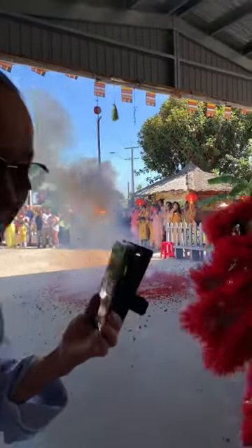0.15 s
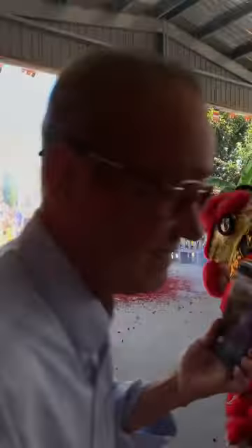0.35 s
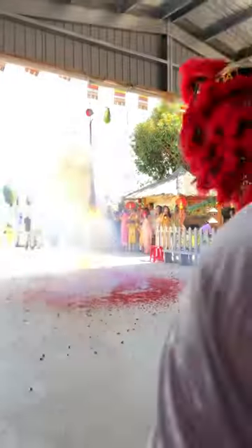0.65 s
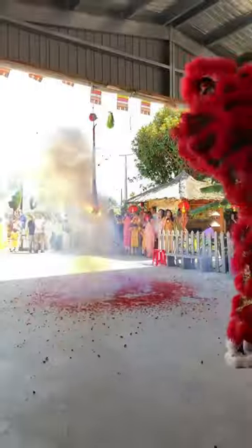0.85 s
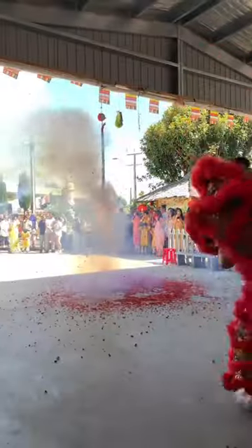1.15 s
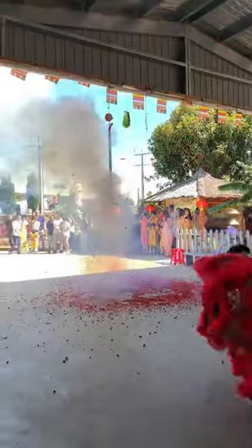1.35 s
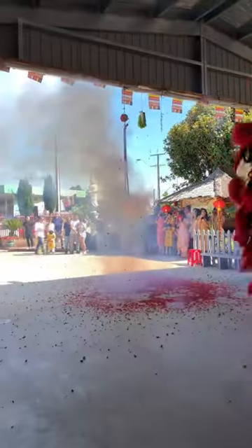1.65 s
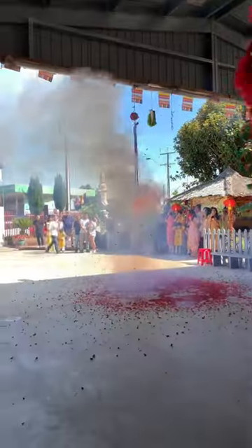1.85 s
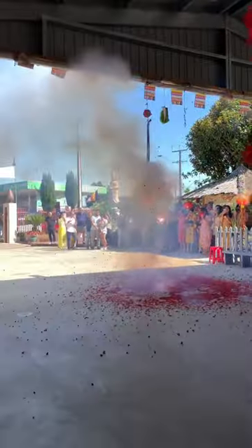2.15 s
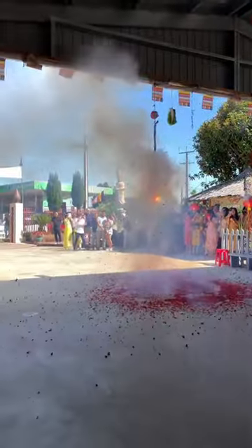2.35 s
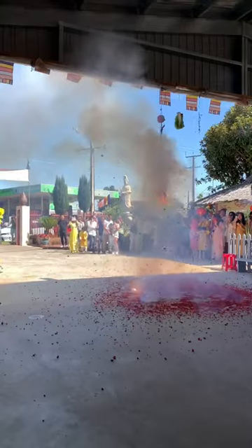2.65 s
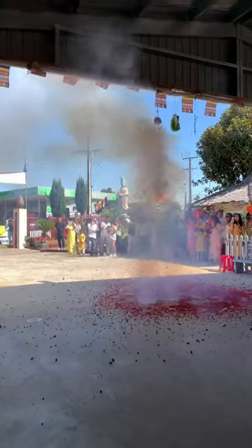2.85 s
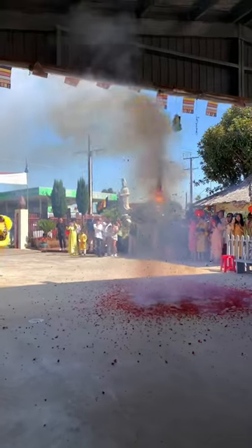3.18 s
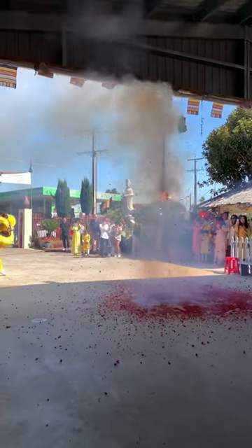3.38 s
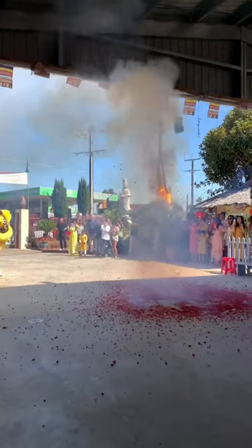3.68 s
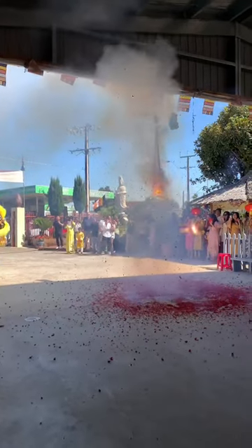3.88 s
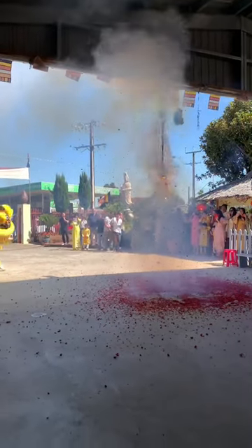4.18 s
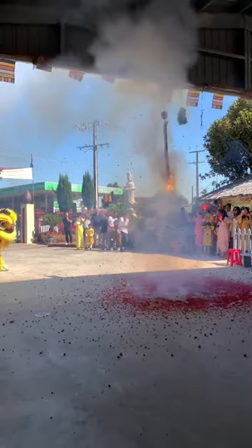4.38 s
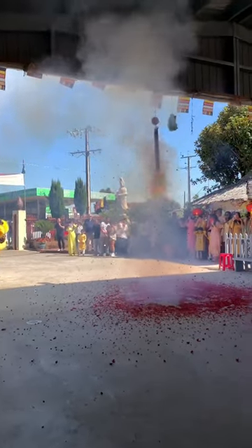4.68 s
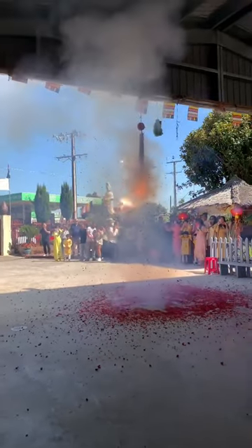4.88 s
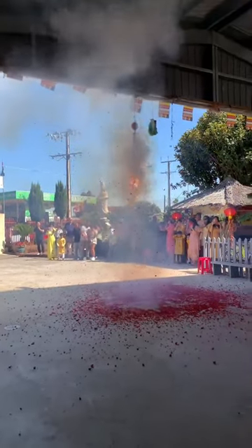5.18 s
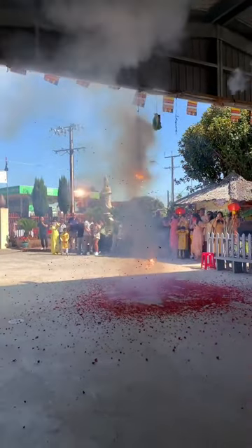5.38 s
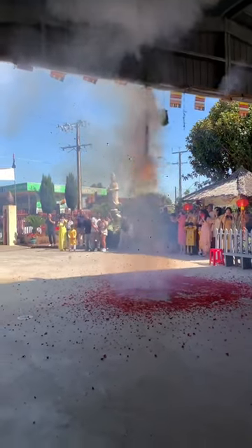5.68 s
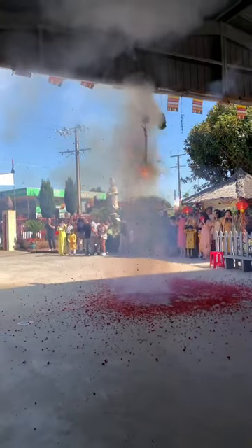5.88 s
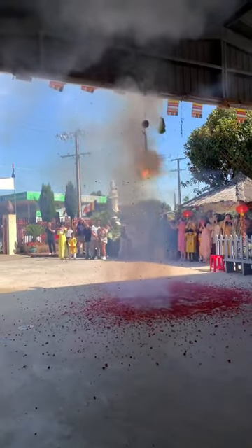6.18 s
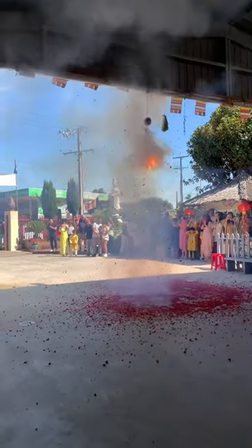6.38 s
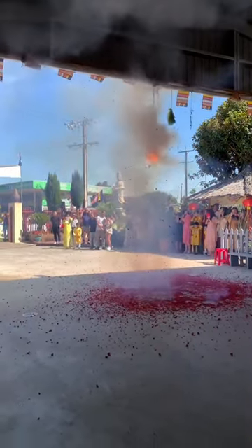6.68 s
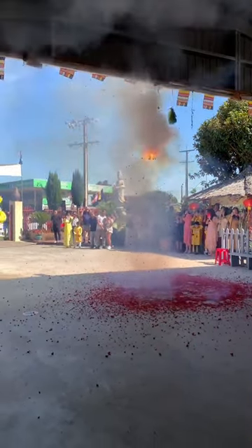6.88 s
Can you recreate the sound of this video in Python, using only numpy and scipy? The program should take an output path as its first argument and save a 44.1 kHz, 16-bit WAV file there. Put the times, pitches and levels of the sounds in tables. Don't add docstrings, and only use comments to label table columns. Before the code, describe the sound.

From 0 s a long firecracker string is already exploding just outside an open, sheet-roofed shed, heard from beneath the roof. Bangs come in quick uneven runs, roughly ten to thirty milliseconds apart, mixed with lone pops of differing loudness. Each has an abrupt shock front, ragged ground bounces, a bright crack and a short low thump. Slaps from roof, posts and floor answer within tens of milliseconds, blurring into a diffuse tail of under a second. Small gaps open around 0.3-0.5 and 0.9 s; from 2 s the crackle thickens. Around 3.6-3.75 s the fuse lulls and only the tail lingers, then it catches again at about 3.8 s, with harder blasts near 4.4, 5.3 and 6.5 s. Slight breaths fall near 5.7 and 6.0 s. Loud bangs continue right to the cut at 7 s. Stereo, peaks softly overloaded, faint street hiss beneath.

```python
import sys
import numpy as np
from scipy import signal
from scipy.fft import rfft, irfft, next_fast_len
from scipy.io import wavfile

SR = 44100
rng = np.random.default_rng(int(sys.argv[2]) if len(sys.argv) > 2 else 0)


def to_wav(s):
    ch = np.atleast_2d(s).T
    pcm = np.round(np.clip(ch, -1, 1) * 32767)
    wavfile.write(sys.argv[1], SR, pcm.astype(np.int16))


def elevation(decibels):
    levels = np.asarray(decibels, float)
    return 10 ** (levels / 20)


N = 310464
SIZE = next_fast_len(N + SR)
HZ = np.arange(SIZE // 2 + 1) * SR / SIZE
RUN_IN = int(.1 * SR)
PLACES = 10


def at_hz(table, hz):
    at, *columns = np.transpose(table)
    return [np.interp(np.log(hz), np.log(at), column) for column in columns]


def butter(x, hz, kind):
    return signal.sosfilt(signal.butter(2, hz, kind, fs=SR, output="sos"), x)


def causal(db):
    cepstrum = irfft(np.log(elevation(db)), SIZE)
    cepstrum[1:SIZE // 2] *= 2
    cepstrum[SIZE // 2 + 1:] = 0
    return np.exp(rfft(cepstrum))


def fuse(count=12):
    # (start [s], first cracker [dB], last cracker [dB], thump re blast [dB])
    runs_before_lull = [(0.053, -9.5, -9, -17), (0.157, -9, -13.5, -8.5), (0.216, -9, -20, -11),
                        (.515, -6, -15, -17.5), (0.755, -10, -8, -12), (0.808, -11, -6, -11),
                        (1.007, -15, -6.5, -11), (1.181, -9, -7, -14), (1.31, -8, -6, -9.5),
                        (1.529, -9.5, -13, -12), (1.6, -11, -9.5, -13.5), (1.747, -10, -10.5, -18.5),
                        (1.807, -8.5, -9.5, -13), (2.007, -9.5, -10.5, -12.5), (2.153, -8, -7.5, -8),
                        (2.291, -7, -12, -13.5), (2.393, -8.5, -16, -18), (2.531, -11.5, -9, -10.5),
                        (2.809, -10, -14.5, -12.5), (2.916, -9, -17, -9), (3, -9, -9, -19),
                        (3.071, -10, -8.5, -13), (3.305, -9, -12, -12.5), (3.442, -11.5, -15, -9)]
    # (start [s], first cracker [dB], last cracker [dB], thump re blast [dB])
    runs_after_lull = [(3.778, -11, -9.5, -15.5), (3.935, -9.5, -13.5, -13.5), (4.046, -9, -15, -29),
                       (4.136, -6, -10, -18), (4.222, -14.5, -10.5, -9.5), (4.391, -5.5, -3.5, -14.5),
                       (4.586, -11, -11.5, -10), (4.782, -10, -4.5, -11), (4.999, -7, -11.5, -13),
                       (5.117, -8, -8, -8.5), (5.277, -9, -39, -13.5), (5.323, -4, -9, -17),
                       (5.428, -9, -9, -8.5), (5.543, -8.5, -12, -8.5), (5.622, -7, -8.5, -10.5),
                       (5.853, -8, -15, -13.5), (5.901, -9, -13, -7), (6.079, -8.5, -12.5, -14.5),
                       (6.347, -10.5, -11.5, -16), (6.437, -10, -11, -9), (6.533, -7, -12.5, -16),
                       (6.741, -8.5, -19, -15.5), (6.88, -10.5, -8, -17), (6.979, -4, -7, -13)]
    lengths_before_lull = [56, 31, 67, 57, 7, 14, 101, 64, 75, 9, 18, 22, 139, 108, 84, 30, 57, 134, 32, 51,
                           27, 111, 52, 111]
    lengths_after_lull = [43, 60, 21, 55, 68, 88, 27, 44, 38, 48, 12, 77, 92, 63, 40, 14, 64, 78, 57, 78,
                          72, 47, 71, 53]
    # (time [s], blast [dB], crack re blast [dB],
    # thump re blast [dB])
    standout_crackers = [(-.012, -5.5, -11, -13), (.088, -9.5, -12, -6.5), (.394, -13, -8.5, -9),
                         (.539, -8, -10, -9.5), (.558, -8, -10, -34), (.624, -14, -0.5, -7),
                         (0.68, -11, -9, -14), (.942, -11, -3.5, -13.5), (1.018, -6, -3, -24),
                         (1.031, -9.5, -13, -15.5), (1.097, -8, -16, -23), (1.199, -3, -10, -14),
                         (1.218, -9, -5.5, -37), (1.326, -7.5, -13, -14), (1.439, -11, -5.5, -36),
                         (2.061, -7.5, -4.5, -7), (2.094, -7, -11, -10.5), (2.162, -5, -9, -7),
                         (2.437, -5, -10, -14.5), (2.491, -10, -8.5, -9), (2.568, -5.5, -11, -34),
                         (2.63, -7.5, -8, -17.5), (2.711, -7.5, -5.5, -13.5), (2.756, -10, -10, -17),
                         (2.822, -8.5, -6, -20), (2.939, -7, -13, -6), (3.253, -9, -11, -8),
                         (3.406, -8.5, -8, -13), (3.456, -9.5, -10, -17), (3.486, -5.5, -19, -31),
                         (3.8, -9.5, -5.5, -22), (3.9, -10, -12, -18), (4.052, -7, -8, -8),
                          (4.243, -5, -12, -14), (4.338, -7.5, -12, -12.5), (4.423, -8.5, -5, -16),
                          (4.451, -7.5, -10, -10), (4.674, -9, -6.5, -16), (4.714, -9.5, -7.5, -14),
                          (4.744, -13.5, -1, -5), (4.809, -9, -4.5, -11), (4.893, -8, -16, -30),
                          (4.932, -5.5, -9, -11), (5.137, -9.5, -3, -11), (5.219, -9.5, -8, -12),
                          (5.327, -7.5, -10, -8), (5.476, -9, -3, -29), (5.575, -6.5, -14, -15),
                          (5.792, -8.5, -8.5, -14), (6.223, -10, -7, -27), (6.249, -7.5, -7.5, -15.5),
                          (6.289, -8, -8.5, -18), (6.469, -3.5, -11.5, -17), (6.493, -6, -8, -24),
                          (6.647, -10.5, -12, -16), (6.679, -9, -10, -33), (6.844, -6, -12.5, -23),
                          (6.943, -6.5, -9.5, -21), (5.345, -9, -3, -7.5), (7.008, -3, -10, -22),
                         (.083, -6.5, -8, -13), (0.175, -6.5, -21, -11), (.248, -8.5, -13, -13.5),
                    (1.052, -9.5, -7, -14), (1.071, -11, -3, -11), (1.337, -9, -12, -16),
                    (1.361, -12, -6, -19), (1.83, -12, -3, -8), (1.856, -12, -16, -15),
                    (1.888, -17, -20, -1.5), (1.919, -12, -7, -21), (2.304, -10, -18, -7),
                    (2.588, -10, -10, -12), (2.658, -14, -8, -5), (3.106, -9.5, -6, -15),
                    (3.149, -10, -2, -13), (3.323, -13, 0, -13), (3.519, -9, -11, -16),
                    (3.955, -9, -10, -16), (4.172, -10.5, -5, -11), (4.266, -11.5, 0, -10),
                    (4.439, -6, -15, -16), (5.372, -9, -3, -10), (5.496, -6, -12, -14),
                    (5.563, -3, -8, -30), (5.922, -9.5, -4, -22), (5.94, -5, -11, -16),
                    (5.959, -8, -8, -24), (6.562, -7.5, -28, -22), (6.924, -7.5, -5, -12.5)]
    # (time [s], blast [dB], thump re blast [dB])
    more_pops = [(0.109, -15.5, -11), (0.186, -20, -22), (0.29, -12, -18), (0.571, -15, -18),
                 (0.755, -12.5, -23), (0.87, -26, -18), (1.109, -11.5, -12), (1.128, -18, -16),
                 (1.145, -22, -21), (1.191, -11.5, -8), (1.248, -8.5, -10), (1.539, -23, -8),
                 (1.539, -10.5, -26), (1.577, -24, -18), (1.634, -19.5, -18), (1.677, -28, -23),
                 (1.766, -16, -12), (1.936, -17, -18), (1.945, -12, -6), (1.991, -20, -18),
                 (2.035, -10, -27), (2.05, -12, -7), (2.103, -10, -9), (2.132, -15, -27),
                 (2.236, -15.5, -18), (2.255, -12, -18), (2.402, -11, -25), (2.56, -13.5, -14),
                 (2.609, -9.5, -12), (2.643, -7.5, -18), (2.675, -14.5, -13), (2.705, -16, -6),
                 (2.84, -12, -13), (2.931, -8, -27), (2.968, -14, -22), (3.009, -19, -24),
                 (3.027, -20, -16), (3.09, -8, -11), (3.12, -14, -18), (3.179, -13, -3),
                 (3.262, -12.5, -21), (3.356, -8, -12), (3.465, -11, -32), (3.551, -11.5, -17),
                 (3.571, -20, -18),
                 (3.835, -22, -5), (3.98, -12, -23), (3.99, -9.5, -11), (4.071, -14, -22),
                            (4.162, -10.5, -14), (4.289, -11, -17), (4.407, -8.5, -16), (4.631, -20, -16),
                            (4.737, -17, 2), (4.813, -9, -23), (4.898, -9.5, -18), (5.015, -12, -15),
                            (5.15, -6, -26), (5.29, -19, -14), (5.396, -10.5, -10), (5.452, -7, -16),
                            (5.518, -12, -12), (5.53, -12, -18), (5.568, -9.5, -14), (5.595, -8, -21),
                            (5.811, -16, -23), (5.869, -15, -18), (5.891, -10, -21), (5.907, -9, -23),
                            (6.088, -16, -10), (6.102, -5, -17), (6.132, -9, -14), (6.157, -17.5, -19),
                            (6.376, -10.5, -13), (6.403, -12.5, -14), (6.59, -10, -22), (6.787, -11, -14),
                            (6.865, -17, -21), (6.892, -17, -20), (7.019, -8.5, -1)]
    shortest_gap_s, gap_spread_s = .012, .016
    inner_loss_db, inner_scatter_db = 4, 2
    run_crack_db, usual_blast_db, crack_follows = -16.5, -10, .62
    hollow_share, hollow_loss_db = .65, 12

    start, first_db, last_db, thump_db = np.transpose(runs_before_lull + runs_after_lull)[:, :, None]
    length = np.array(lengths_before_lull + lengths_after_lull)[:, None] / 1000
    pops = [(s, db, -8.5, low_db) for s, db, low_db in more_pops]
    singles = np.transpose(standout_crackers + pops)

    gap, size, bright, hollow = rng.random((len(start), count, 4)).transpose(2, 0, 1)
    after = np.cumsum(shortest_gap_s + gap_spread_s * gap, axis=1)
    after -= after[:, 1:2]
    after[:, 0], after[:, 1] = 0, length[:, 0]
    inner = np.arange(count) > 1

    blast = first_db + (last_db - first_db) * np.minimum(after / length, 1)
    blast = blast - inner * (inner_loss_db + inner_scatter_db * (2 * size - 1))
    crack = run_crack_db + crack_follows * (blast - usual_blast_db) - blast
    crack = crack + 2 * bright - 1
    thump = thump_db - hollow_loss_db * (hollow < hollow_share) * inner

    to_single = np.abs((start + after)[..., None] - singles[0]).min(axis=2)
    crowded = to_single < shortest_gap_s - .002
    silent = inner & (crowded | (after > length - shortest_gap_s / 2))
    runs = np.stack([start + after, blast - 200 * silent, crack, thump]).reshape(4, -1)
    return np.hstack([runs, singles])


def even_body(lag, size):
    hz = np.geomspace(600, 3000, 16)[:, None, None]
    power = np.abs(np.sum(size * np.exp(-2j * np.pi * hz * lag), axis=2)) ** 2
    return size / np.sqrt(power.mean(axis=0))[:, None]


def blasts(string, lag, size, late, low_db, high_db, places):
    crack_gain_db, thump_gain_db = 11, 23
    thump_top_hz, glide_cycles = 200, .8
    s, blast_db, crack_db, thump_db = string
    at = ((s[:, None] + lag) * SR).astype(int) + RUN_IN
    at = np.clip(at, 0, N + RUN_IN - 1)
    place = (np.arange(len(s))[:, None] * 7 // 5) % places + 0 * at

    blast, crack, thump = np.zeros((3, places, N + 2 * RUN_IN)) + 1e-18
    np.add.at(blast, (place, at), size * elevation(blast_db)[:, None])
    np.add.at(crack, (place, at), size * elevation(blast_db + crack_db + crack_gain_db + high_db)[:, None])
    thump_at = at[:, 0] + (late * SR).astype(int)
    np.add.at(thump, (place[:, 0], thump_at), -elevation(blast_db + thump_db + thump_gain_db + low_db))

    glide = np.exp(-2j * np.pi * glide_cycles * np.log(1 + HZ / 20))
    upper = butter(crack, 4540, "high") - butter(blast, [320, 4200], "band")
    return rfft(butter(thump, thump_top_hz, "low"), SIZE) * glide + rfft(upper, SIZE)


def crackers(count=14):
    bounce_s, bounce_db, thump_late_s = .0019, 4.0, .009
    direct_db, direct_crack_db, thump_sent_db = 6.5, -7.0, 4.0
    string = fuse()
    chance = rng.random((string.shape[1], 2, count))
    lag = -bounce_s * np.log(1 - chance[:, 0])
    size = elevation(bounce_db) * (2 * chance[:, 1] - 1)
    lag[:, 0], size[:, 0] = 0, -1
    late = thump_late_s * chance[:, 0, 0]
    heard = blasts(string, lag, even_body(lag, size), late, 0, direct_crack_db, places=1)[0]
    lag, size = lag[:, :4], size[:, :4]
    sent = blasts(string, lag, even_body(lag, size), late, thump_sent_db, 0, places=PLACES)
    return elevation(direct_db) * heard, sent


def slaps(length, count=14):
    first_s, spread_s, slap_db, fade_db_per_s = .010, .02, -10.0, 170
    roof_echo_s, roof_echo_db = .0155, -5.5
    chance = rng.random((3 * PLACES, 2, count))
    lag = first_s - spread_s * np.log(1 - chance[:, 0])
    size = (2 * chance[:, 1] - 1) * elevation(slap_db - fade_db_per_s * lag)
    at = np.minimum(lag * SR, length - 1).astype(int)
    path = np.arange(3 * PLACES)[:, None] + 0 * at
    out = np.zeros((3 * PLACES, length))
    np.add.at(out, (path, at), size)
    out[:PLACES, int(roof_echo_s * SR)] -= elevation(roof_echo_db)
    return butter(out, 280, "high").reshape(3, PLACES, length)


def shed():
    # (frequency [Hz], early T60 [s], late T60 [s], early level [dB], late level [dB], build-up [s])
    decay = [(60.3, 0.036, 0.62, -22, -51.5, 0.0053), (159, 0.046, 1, -15.5, -32.5, 0.0035),
             (400, 0.066, 0.39, -15, -24, 0.00074), (1310, 0.12, 0.91, -17.5, -26, 0.0012),
             (2180, 0.28, 0.82, -17, -24, 0.00073), (4680, 0.11, 0.76, -21.5, -23, 0.00097),
             (9150, 0.11, 0.48, -19.5, -20, 0.0052), (15000, 0.16, 0.38, -21, -30.5, 0.0091)]
    # (frequency [Hz], share [0-1])
    likeness = [(60, .35), (150, .7), (350, 0), (700, .25), (1100, .1), (2000, .6), (2600, .25), (3600, .7),
                (5500, .7), (10000, .6), (14000, .5)]
    grain_db = 3.5
    echo_free_s, scattered_above_hz = .006, 2500
    t = np.arange(2 ** 15) / SR
    white = rng.standard_normal((2, 3, PLACES, len(t)))
    grain = grain_db * rng.standard_normal((3, PLACES, len(t) // 32))
    grain -= grain_db ** 2 * np.log(10) / 20
    white *= elevation(grain).repeat(32, axis=2)

    edges = 28 * 2 ** np.arange(0, 9.6, .5)
    echoes = slaps(len(t))
    for k, (low, high) in enumerate(zip(edges, edges[1:])):
        early_s, late_s, early_db, late_db, rise_s = at_hz(decay, np.sqrt(low * high))
        quiet_s = echo_free_s * min(1, scattered_above_hz / low) ** 2
        fade = elevation(early_db - 3.5 - 60 * t / early_s) + elevation(late_db - 3.5 - 60 * t / late_s)
        rise = 1 - np.exp(-np.maximum(t - quiet_s, 0) / rise_s)
        echoes = echoes + butter(white[k % 2] * fade * rise, [low, high], "band")

    both, *own = rfft(echoes, SIZE)
    alike, = at_hz(likeness, HZ + 1)
    return np.sqrt(alike) * both + np.sqrt(1 - alike) * np.array(own)


def scene():
    # (frequency [Hz], spectrum level per Hz [dB])
    colour = [(22, -37), (55, -2), (150, -3), (390, -3.5), (580, 5), (1400, 4.5), (2200, -2), (4000, -8.5),
              (6000, -9.5), (8000, -12.5), (12000, -11), (15500, -13)]
    # (frequency [Hz], phase [rad])
    lead = [(0, 0), (400, -1.4), (1000, -.9), (1300, -.2), (1600, 0), (2900, 1.4), (3500, 1.4),
            (4750, 3.14), (17200, 21.99), (22050, 29.3)]
    street_db, level_db, left_db = -70, 13, -.3
    direct, shocks = crackers()
    ports = direct + np.sum(shocks * shed(), axis=1)
    ports += elevation(street_db) * rfft(butter(rng.standard_normal((2, SIZE)), 6000, "low"))
    ports *= elevation(level_db) * causal(at_hz(colour, HZ + 1)[0])
    ports[0] *= elevation(left_db)
    ports[1] *= np.exp(-1j * np.interp(HZ, *np.transpose(lead)))
    return irfft(ports, SIZE)[:, RUN_IN:RUN_IN + N]


def top_cut(x):
    return signal.sosfilt(signal.butter(12, 16850, fs=SR, output="sos"), x)


def record(dry):
    rounded = 1.3 * np.tanh(dry / 1.5)
    return top_cut(rounded)


dry = scene()
out = record(dry)
to_wav(out)
```